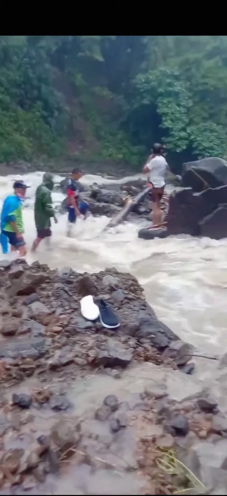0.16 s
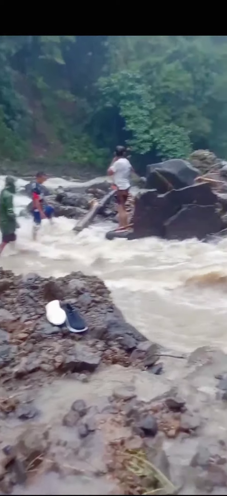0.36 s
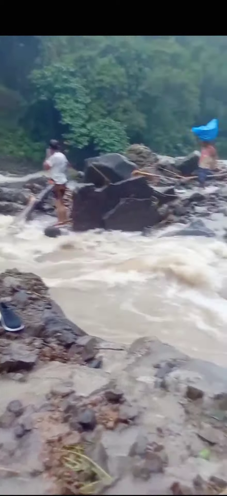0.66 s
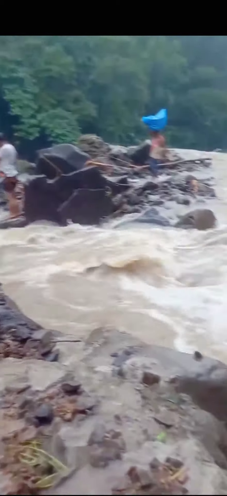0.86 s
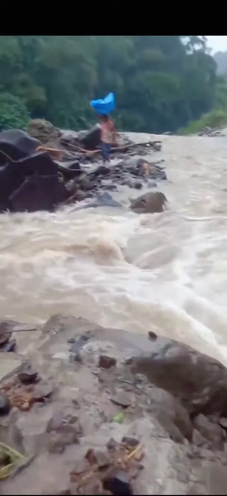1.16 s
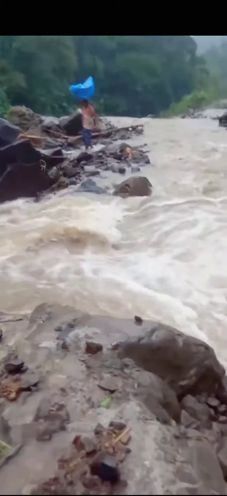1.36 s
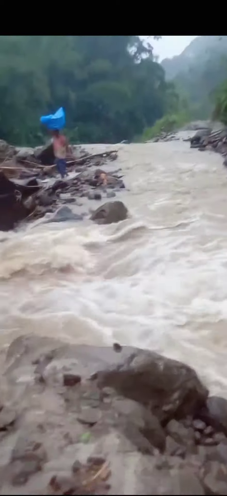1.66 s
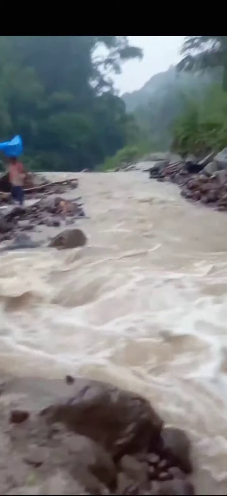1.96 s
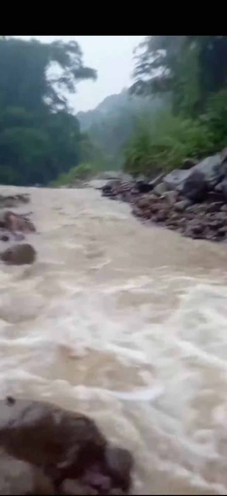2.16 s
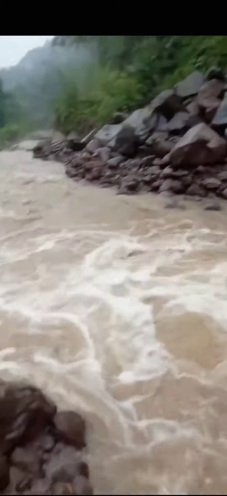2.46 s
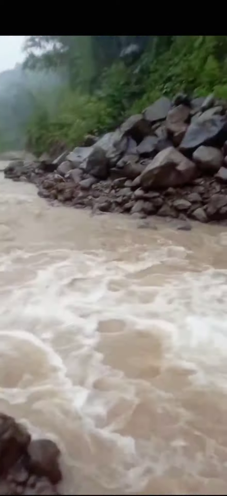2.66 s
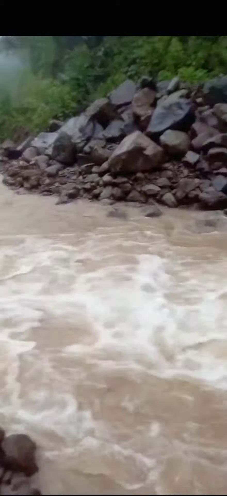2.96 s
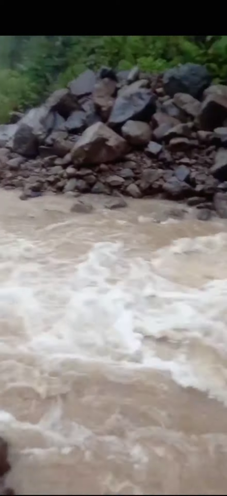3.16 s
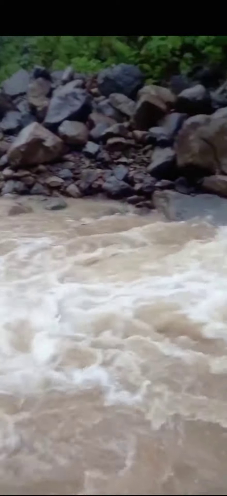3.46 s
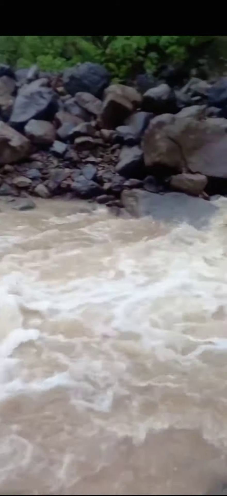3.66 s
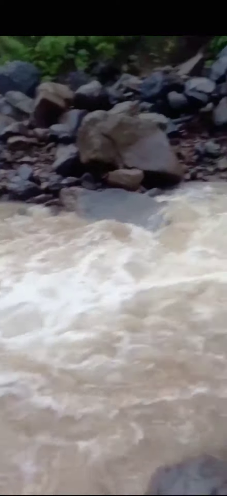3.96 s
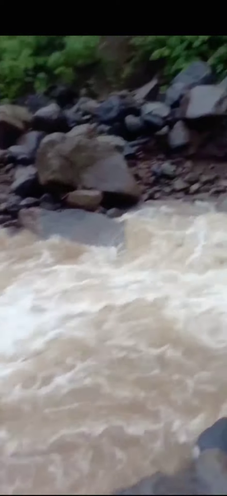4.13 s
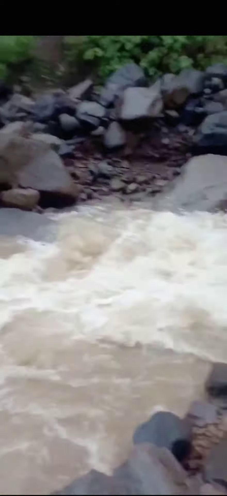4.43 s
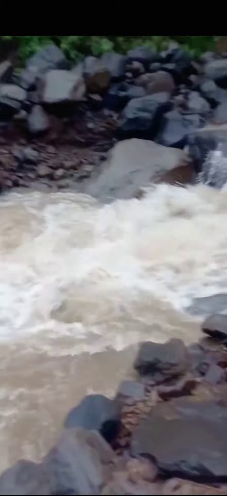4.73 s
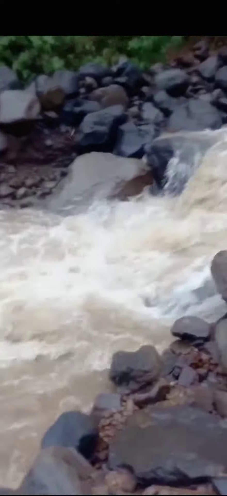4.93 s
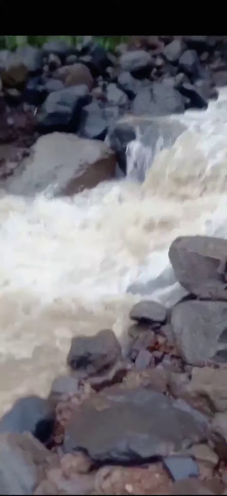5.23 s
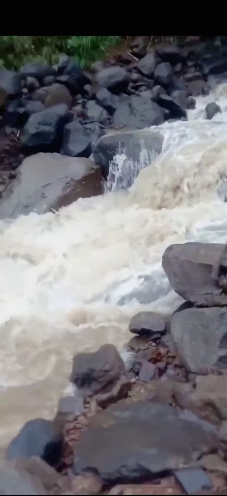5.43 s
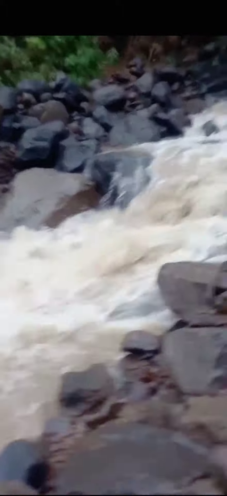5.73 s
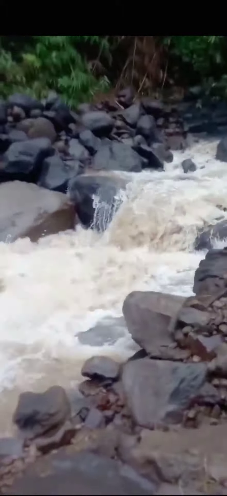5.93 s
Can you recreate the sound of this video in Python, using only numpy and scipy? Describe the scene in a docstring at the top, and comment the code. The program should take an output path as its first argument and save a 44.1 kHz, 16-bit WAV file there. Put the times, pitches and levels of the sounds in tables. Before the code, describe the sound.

A flooded river rushes loudly over boulders, heard from a phone held on the bank, with a deep churn and thin spray under the rush. Sharp little handling knocks come and go from the start, the hardest briefly ducking the water. The rapids are loudest about halfway through, then ease as the splashing of a small cascade grows toward the end.

```python
"""From the start, a muddy river in flood rushes over boulders, heard through a phone held on the bank.
Masses of bubbles make the rush, over a deep churn, a thin spray and a faint rumble. Sharp little
knocks, likely from handling, begin at once and come and go; the phone's limiter turns the water down
after the loud ones. The phone turns toward the rapids, which are loudest at about 3 s. Then it turns
to a small cascade, whose splashing grows until the end at about 6 s."""
import sys
import numpy as np
from scipy import signal
from scipy.io import wavfile
from scipy.ndimage import uniform_filter1d, minimum_filter1d

SR = 44100
rng = np.random.default_rng(int(sys.argv[2]) if len(sys.argv) > 2 else 0)


def bounce(signal):
    """Save signal as a 16-bit WAV file at the path given by the first command-line argument."""
    frames = np.transpose(np.atleast_2d(signal))
    limited = np.clip(frames, -1, 1)
    pcm = np.round(limited * 32767).astype(np.int16)
    wavfile.write(sys.argv[1], SR, pcm)


N = 268569

# How the rapids rise and fall as the phone turns toward them and away: time_s, level_db
RAPIDS_LOUDNESS = [(0, -2.5), (.25, -2.1), (.42, -5.7), (1.1, -3), (1.7, -3), (2.25, -1.23), (3.2, 0.33),
                   (4.05, -0.9), (4.5, -4.5), (4.9, -4.5), (5.35, -7.5), (6.09, -6.5)]
# How loud the cascade's splash is as it comes round to the front: time_s, level_db
CASCADE_LOUDNESS = [(0, -37.5), (1.8, -33), (2.3, -26), (4.4, -27.5), (5.4, -26), (5.8, -23.5),
                    (6.09, -22.5)]

# The tone of each part of the water, from low to high: pitch_hz, level_db
RUSH_TONE = [(1100, -34.5), (1480, -31), (1560, -14.5), (1890, 0.5), (2300, 2.5), (2780, -4), (3430, -10.5),
             (3620, -21), (3900, -39), (5300, -65.5)]  # the river's main voice
CHURN_TONE = [(255, -32.5), (320, -10.5), (370, -15.5), (434, -19.5), (510, -13), (678, -4.5), (739, -7),
              (836, 2), (910, 1), (1000, -7.5), (1180, 1), (1480, -5.5), (1560, -22), (2000, -34.5)]  # the river's deep part
SPRAY_TONE = [(3400, -24.5), (4000, -3), (5500, -1.5), (6800, -6), (7800, -13), (8200, -19), (8550, -21),
              (9000, -30), (9650, -17), (10300, -24.5), (10900, -21.5), (11500, -32.5), (13500, -39.5),
              (15500, -40.5)]  # the river's thin top
SPLASH_TONE = [(1700, -28.5), (2150, -3), (2450, 10.5), (2950, -7), (3500, 1), (3900, -13.5), (4250, -22.5),
               (4600, -25), (5300, -34.5), (8000, -54.5)]  # water splattering off the boulder
HISS_TONE = [(3400, -14.5), (4200, -1.5), (5500, -4), (7000, -13.5), (8800, -29), (10000, -23.5),
             (13000, -42.5)]  # the cascade's high hiss
BOIL_TONE = [(300, -27), (360, -11.5), (440, -15), (650, -3), (870, 3.5), (1000, -8), (1400, -26.5)]  # bubbling below the cascade
RUMBLE_TONE = [(20, -25.5), (80, -28), (100, -27), (122, -35), (165, -29), (195, -10.5), (212, 3.5),
               (235, 3), (262, -12), (320, -30)]  # the bass of plunging water

# Knocks on the phone, with base levels and pitches that knocks() shifts:
# start_s, tick_db, tick_hz, thud_db, thud_hz, snap_db
PHONE_KNOCKS = [ (.027, -11, 2100, -10.5, 690, -52), (.16, -7, 2430, -21, 1100, -38),
                (0.173, -9, 2340, -12, 666, -46), (0.351, 15, 2050, 3, 890, -6),
                (0.5151, -7, 2400, -33, 1140, -32.5), (.732, 10.5, 2240, 7.5, 844, -15),
                (0.9093, 8.5, 2540, -3, 930, -27), (1.4375, -10, 2960, -18.5, 1400, -35),
                (1.4896, -7, 2090, -8.5, 740, -40), (1.519, -0.5, 2580, -11.5, 980, -25),
                (2.05, -6, 2150, -10.5, 940, -36), (2.391, -2, 2240, -11.5, 784, -40),
                (2.5315, -3.5, 2910, -22, 940, -44), (2.598, -11, 1870, -11, 940, -26),
                (2.779, -3, 2180, -12, 1190, -34), (3.321, -16, 2310, -10.5, 840, -27),
                (3.451, 13, 2480, 2, 1200, 0), (3.5208, -16, 2020, -6, 955, -26),
                (4.108, 11, 2500, 6.5, 840, -28), (4.134, 7, 2850, 1, 1260, -17),
                (4.323, 6, 1930, -25, 1400, -12.5), (4.4122, 13, 2070, 7.5, 1320, -7),
                (4.4902, -7, 2250, -11, 870, -42), (4.5461, 10, 2470, -9, 1080, -38),
                (5.173, -5, 2210, -15, 820, -42), (5.1995, -15, 2120, -14.5, 680, -41),
                (5.2073, 9.5, 1900, 5.5, 1124, -23), (5.7873, -3.5, 1760, -11, 1020, -28)]
# The high notes of the phone's case, also base values: pitch_hz, level_db, fade_s (time to drop 60 dB)
CLACK_NOTES = [(3320, 0.5, 0.0076), (4040, -8.5, 0.0055), (4500, 4.5, 0.0038)]
# The tone of a knock's bright edge: pitch_hz, level_db
SNAP_TONE = [(2000, -20.5), (3500, 2), (4800, -4), (6000, -11), (7800, -3.5), (9000, -28), (10000, -23),
             (12000, -29.5), (15000, -41)]


def river(churn_db=-29, rush_db=-13.5, spray_db=-49):
    """Masses of popping bubbles make a low churn, a loud rush and a high spray that heave together."""
    rapids_db = level_over_time(RAPIDS_LOUDNESS)
    heave = surge(slow_hz=2.5, fast_hz=23.0)
    churn = patchy(bubbles(per_s=900, spread_db=0, wash_db=0), depth_db=0.85, patch_size=(6, 8))
    rush = patchy(bubbles(per_s=3600, spread_db=1, wash_db=3.5), depth_db=1.05)
    spray = patchy(bubbles(per_s=17000, spread_db=4.5, wash_db=5), depth_db=2)
    return (shaped(churn, CHURN_TONE, churn_db + 0.99 * rapids_db + 0.19 * heave)
            + shaped(rush, RUSH_TONE, rush_db + rapids_db + 0.12 * heave)
            + shaped(spray, SPRAY_TONE, spray_db + 0.93 * rapids_db + 0.45 * heave))


def cascade(hiss_db=-46, boil_db=-37):
    """Water splatters off a boulder and bubbles below it; its hiss is heard only from the front."""
    splash_db = level_over_time(CASCADE_LOUDNESS)
    facing_db = splash_db - splash_db.max()  # zero when the phone faces the cascade
    splash = bubbles(per_s=2500, spread_db=4, wash_db=0)
    hiss = patchy(bubbles(per_s=5800, spread_db=3.5, wash_db=8.5), depth_db=4)
    boil = bubbles(per_s=810, spread_db=0.5, wash_db=0.5)
    return (shaped(splash, SPLASH_TONE, splash_db)
            + shaped(hiss, HISS_TONE, hiss_db + 2.2 * facing_db)
            + shaped(boil, BOIL_TONE, boil_db + 0.8 * facing_db))


def knocks(roughness=0.28, snap_fade_s=0.0091):
    """Each knock rings the phone's case with a tick and a thud; hard ones add a clack and a snap."""
    t = np.arange(SR // 20) / SR
    rise = 1 - np.exp(-t / 0.0004)
    # The highs of a knock arrive first and the lows trail, so its pitch sags a little.
    sag = 0.88 + 0.3 * np.exp(-t / 0.003)

    def ring(pitch_hz, level_db, fade_s):
        """One note of the case, dropping 60 dB in fade_s and roughened by the rattling contact."""
        rattle = 1 + roughness * evened(uniform_filter1d(rng.standard_normal(len(t)), size=24))
        note = np.sin(2 * np.pi * np.cumsum(pitch_hz * sag) / SR)
        return rise * rattle * gain_of(level_db - 60 * t / fade_s) * note

    rings, snaps = np.zeros(N), np.zeros(N)
    for start_s, tick_db, tick_hz, thud_db, thud_hz, snap_db in PHONE_KNOCKS:
        tick = ring(tick_hz, tick_db + 3, fade_s=0.014)
        thud = ring(thud_hz, thud_db + 2, fade_s=0.012)
        low_thud = ring(0.84 * thud_hz, thud_db - 8, fade_s=0.0092)
        clack = gain_of(snap_db + 2) * sum(ring(*note) for note in CLACK_NOTES)
        snap = shaped(rng.standard_normal(len(t)), SNAP_TONE, snap_db - 8 - 60 * t / snap_fade_s)
        add(rings, start_s, tick + thud + low_thud + clack)
        add(snaps, start_s, snap)
    case_filter = signal.butter(4, [500, 5400], "bandpass", fs=SR, output="sos")
    return signal.sosfilt(case_filter, rings) + snaps


def rumble(full_db=-56.5, gulp_db=9, lull_db=-1, softness_db=3):
    """Plunging water makes hollow bass gulps, which run together where the rapids are loud."""
    gulps_db = gulp_db * surge(slow_hz=3, fast_hz=12)
    swell_db = lull_db + 2.2 * level_over_time(RAPIDS_LOUDNESS) + gulps_db
    dip_db = softness_db * np.logaddexp(0, -swell_db / softness_db)  # keeps dips, flattens peaks
    return shaped(rng.standard_normal(N), RUMBLE_TONE, full_db - dip_db)


def bubbles(per_s, spread_db, wash_db):
    """Near bubbles pop at uneven strengths over the smooth wash of countless far ones."""
    strength = gain_of(spread_db * np.minimum(rng.exponential(1, N), 4))
    pops = strength * rng.choice([-1, 1], N) * (rng.random(N) < per_s / SR)
    return evened(pops) + gain_of(wash_db) * rng.standard_normal(N)


def patchy(sound, depth_db, patch_size=(12, 10)):
    """Clouds of like-sized bubbles come and go, so separate pitch ranges swell and fade."""
    spectrum = signal.stft(sound, nperseg=1024, noverlap=768)[2]
    clouds = uniform_filter1d(rng.standard_normal(spectrum.shape), patch_size[0], axis=0)  # across pitch
    clouds = uniform_filter1d(clouds, patch_size[1], axis=1)  # across time
    spectrum *= gain_of(depth_db * evened(clouds))
    return signal.istft(spectrum, nperseg=1024, noverlap=768)[1][:N]


def surge(slow_hz, fast_hz, count=30):
    """The flow heaves at random: many waves added up, the slow ones strongest."""
    t = np.linspace(0, N / SR, N // 100)
    rates_hz = np.geomspace(slow_hz, fast_hz, count)
    waves = sum(np.sin(2 * np.pi * (hz * t + rng.random())) / np.sqrt(hz) for hz in rates_hz)
    return np.interp(np.arange(N) / SR, t, evened(waves))


def shaped(sound, tone, level_db, size=4096):
    """Gives a sound the tone in a table, then sets its level."""
    tone_hz, tone_db = np.transpose(tone)
    hz = abs(np.fft.fftfreq(size, 1 / SR)) + 1  # the 1 avoids the log of zero
    log_gain = np.log(gain_of(np.interp(np.log(hz), np.log(tone_hz + 1), tone_db)))
    # Pitches beyond either end of the table fade away.
    low_cut = np.clip(hz / max(tone_hz[0], 1), 0, 1)
    high_cut = np.clip(tone_hz[-1] / hz, 0, 1) ** 2
    log_gain += 2 * np.log(low_cut * high_cut)
    # This makes each pop ring after it happens, not before.
    ring = np.fft.ifft(np.exp(np.conj(signal.hilbert(log_gain)))).real
    return evened(signal.oaconvolve(sound, ring)[:len(sound)]) * gain_of(level_db)


def level_over_time(rows):
    """Joins a table's levels with straight lines."""
    time_s, level_db = np.transpose(rows)
    return np.interp(np.arange(N) / SR, time_s, level_db)


def gain_of(db):
    """Turns decibels into a number to multiply by."""
    return 10 ** (np.asarray(db) / 20)


def evened(sound):
    """Scales a sound to an average strength (rms) of one."""
    return sound / np.sqrt(np.mean(sound ** 2) + 1e-20)


def add(mix, start_s, sound):
    """Lays a sound into the mix at start_s."""
    part = mix[round(start_s * SR):][:len(sound)]
    part += sound[:len(part)]


def held(over_db, db_per_s):
    """Holds each peak and lets it fall at a steady rate."""
    fall_db = np.arange(N) * db_per_s / SR
    return np.maximum.accumulate(over_db + fall_db) - fall_db


def limiter(sound, ceiling_db=-1.6, slow_share=0.2, ahead_samples=120):
    """Turns the sound down just before a loud peak; most of it comes back quickly, the rest slowly."""
    over_db = np.maximum(20 * np.log10(abs(sound) + 1e-9) - ceiling_db, 0)
    over_db = -minimum_filter1d(-over_db, 2 * ahead_samples)  # the biggest peak nearby
    cut_db = np.maximum(held(over_db, db_per_s=520), held(slow_share * over_db, db_per_s=22))
    smooth_cut_db = uniform_filter1d(uniform_filter1d(cut_db, ahead_samples), ahead_samples)
    return sound * gain_of(-smooth_cut_db)


def scene():
    """The water and the knocks reach one microphone."""
    return (river() + cascade() + rumble() + knocks())[None]


def record(dry):
    """The phone holds down loud peaks, then cuts off the very highest pitches."""
    low_pass = signal.firwin(511, cutoff=15700, window=("kaiser", 9), fs=SR)
    return signal.oaconvolve(limiter(dry[0]), low_pass, "same")[None]


dry = scene()
out = record(dry)
bounce(out)
```